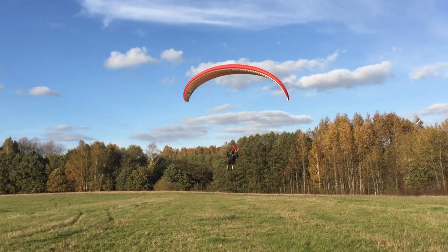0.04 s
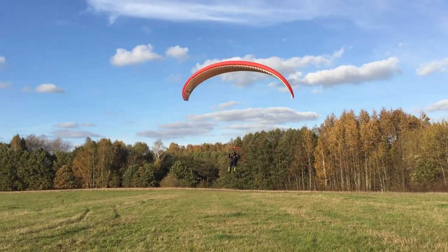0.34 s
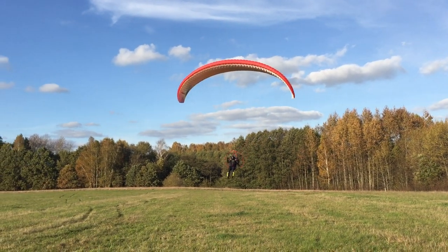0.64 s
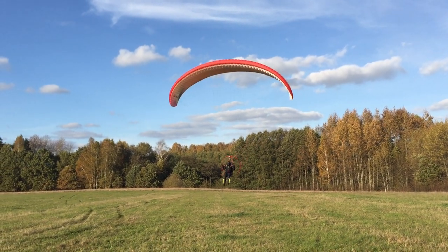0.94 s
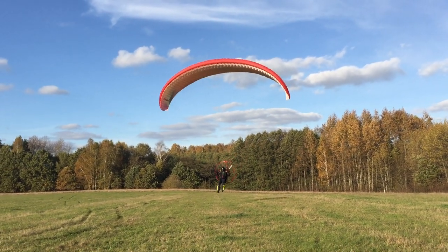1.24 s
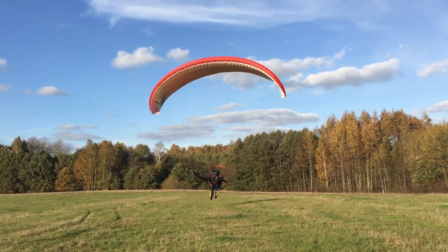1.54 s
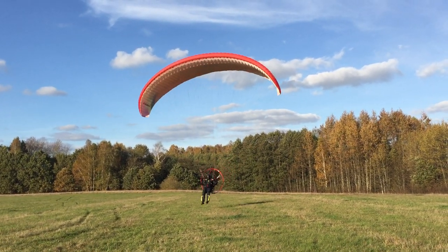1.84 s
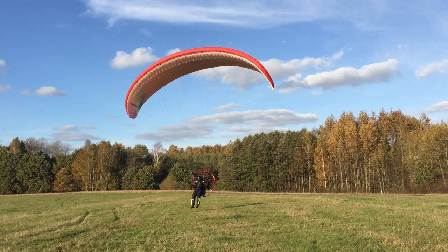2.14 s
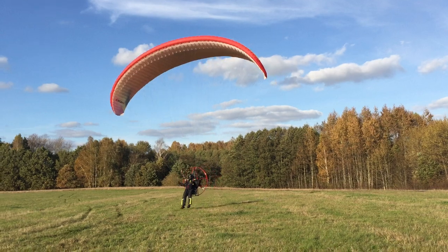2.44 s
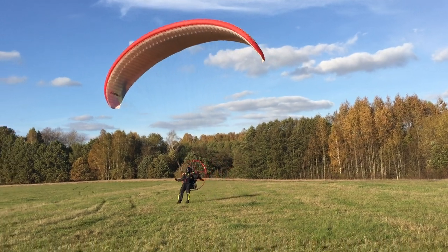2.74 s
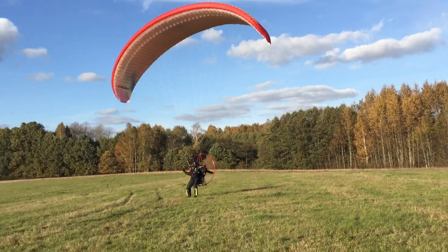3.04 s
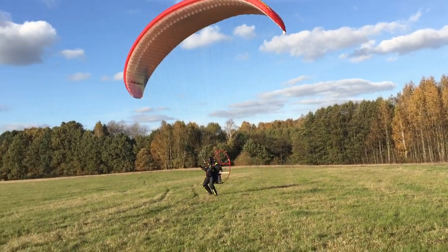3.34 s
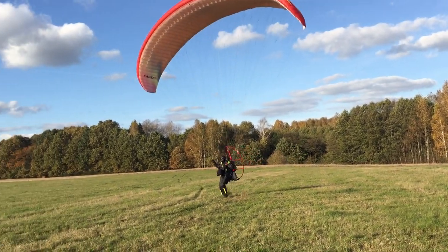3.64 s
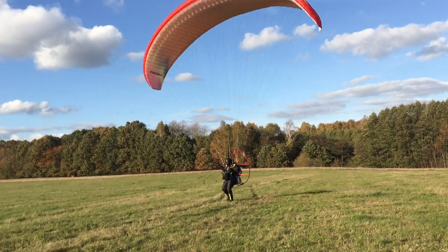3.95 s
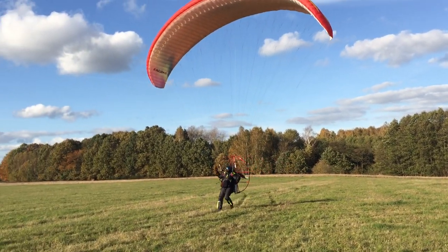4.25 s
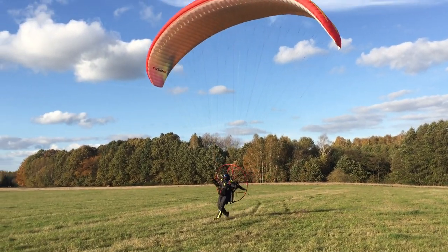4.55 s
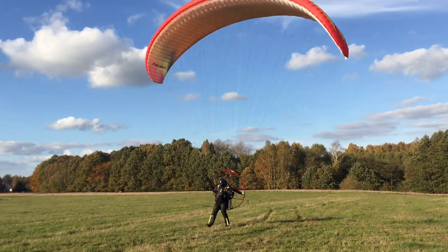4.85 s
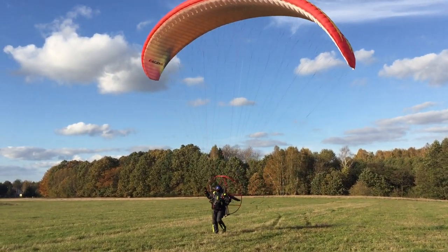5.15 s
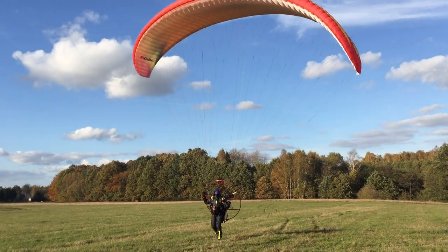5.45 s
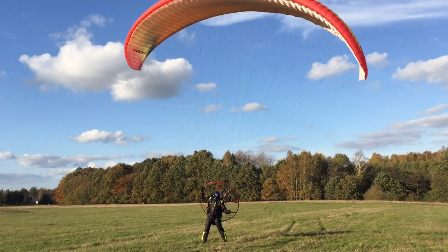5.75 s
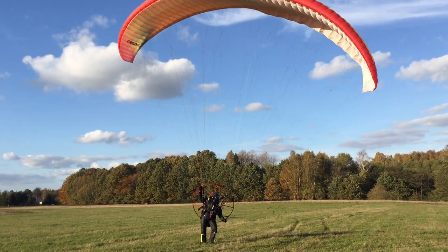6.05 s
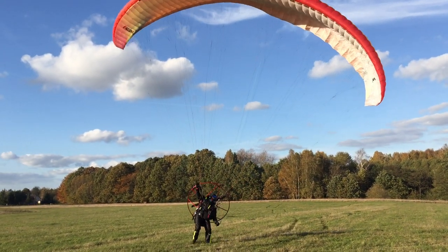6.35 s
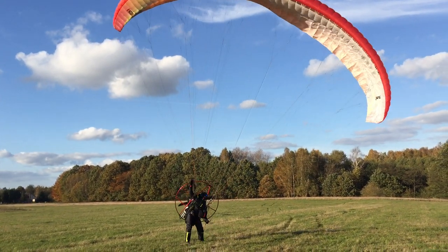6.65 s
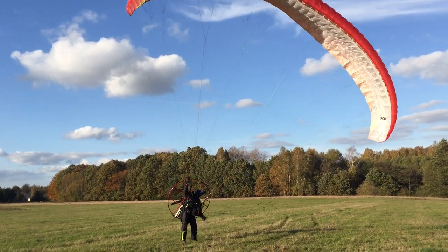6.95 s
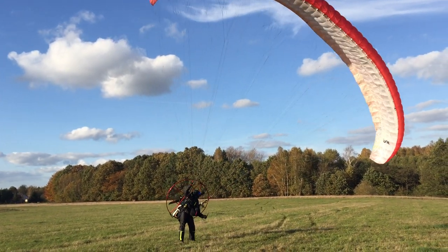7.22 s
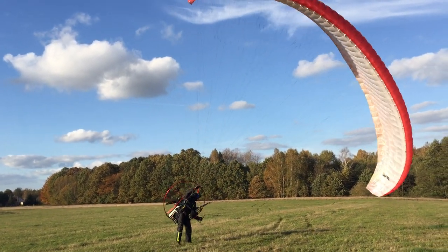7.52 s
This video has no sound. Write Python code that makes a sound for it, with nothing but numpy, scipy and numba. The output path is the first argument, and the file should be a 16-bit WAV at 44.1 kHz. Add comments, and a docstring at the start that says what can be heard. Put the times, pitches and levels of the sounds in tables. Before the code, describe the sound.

A paramotor idles over an open field, its small two-stroke engine popping unevenly while the propeller swishes and the cage buzzes. It grows sharper as it nears, then cuts out a little past halfway and coasts down. Harness buckles clink lightly. Wind on the microphone, a low rumble at first, builds into hard thumps and flaps that dominate the rest, over a faint rustle of grass and cloth.

```python
"""Paramotor landing on a field

The two-stroke idles, firing unevenly, mostly every second or third turn. The propeller swishes,
the cage buzzes, the belt squeaks; the engine is cut and coasts down, and harness buckles clink.
Wind buffets the microphone, lightly at first, then in hard flaps while the wing sinks."""
import sys
import numpy as np
from scipy import signal
from scipy.fft import rfft, irfft
from scipy.io import wavfile
from scipy.ndimage import uniform_filter1d, map_coordinates
from numba import njit

SR = 44100
rng = np.random.default_rng(int(sys.argv[2]) if len(sys.argv) > 2 else 0)


def output_pcm(signal):
    """Save a mono or channel-first signal as 16-bit PCM at the path in sys.argv[1].

    Samples are clipped to [-1, 1] before scaling.
    """
    pcm = np.clip(np.atleast_2d(signal).T, -1, 1) * 32767
    wavfile.write(sys.argv[1], SR, np.round(pcm).astype(np.int16))


N = 338688
T = np.arange(N) / SR
IDLE_HZ = 38


def undb(db):
    """Decibels to gain."""
    return 10 ** (np.asarray(db) / 20)


def unit(x):
    """Scale to rms 1."""
    return x / np.sqrt(np.mean(x ** 2) + 1e-20)


def even(x, span_samples):
    """Hold a noise's running rms near 1."""
    return x / np.sqrt(uniform_filter1d(uniform_filter1d(x ** 2, span_samples), span_samples) + 0.05)


def curves(table):
    """A timed table's columns, interpolated per sample."""
    time_s, *columns = np.transpose(table)
    return [np.interp(T, time_s, column) for column in columns]


def noise(spectrum):
    """Noise shaped by (freq_hz, density_db) points, silent above the last; rms 1."""
    hz, db = np.transpose(spectrum)
    bins_hz = np.maximum(np.arange(N // 2 + 1) * SR / N, 1)
    gain = undb(np.interp(np.log(bins_hz), np.log(hz), db, right=-np.inf))
    return unit(irfft(rfft(rng.standard_normal(N)) * gain, N))


def walk(rate_hz):
    """Smooth random drift; rms 1."""
    span = max(int(SR / rate_hz), 2)
    return unit(uniform_filter1d(uniform_filter1d(rng.standard_normal(N), span), span))


def patchy(x, depth_db):
    """Gusty air lets narrow bands swell and fade on their own; rms 1."""
    bands = signal.stft(x, nperseg=1024)[2]
    drift = uniform_filter1d(rng.standard_normal(bands.shape), size=4, axis=0)
    drift = unit(uniform_filter1d(drift, size=5, axis=1))
    return unit(signal.istft(bands * undb(depth_db * drift))[1][:N])


def resonant_noise(pitch_hz, width_hz):
    """White noise passed twice through one resonance."""
    b, a = signal.iirpeak(pitch_hz, pitch_hz / width_hz, fs=SR)
    return signal.lfilter(b, a, signal.lfilter(b, a, rng.standard_normal(N)))


@njit
def lowpass(x, edge_hz, damping):
    """State-variable low-pass with a moving edge."""
    y, band_state, low_state = np.empty(len(x)), 0., 0.
    for i in range(len(x)):
        g = np.tan(np.pi * min(edge_hz[i], SR / 4) / SR)
        band = (band_state + g * (x[i] - low_state)) / (1 + g * (g + damping))
        y[i] = low_state + g * band
        band_state, low_state = 2 * band - band_state, 2 * y[i] - low_state
    return y


def delayed(x, lag_s):
    """Moving delay."""
    return map_coordinates(x, [(T - lag_s) * SR], order=5, mode="mirror")


def add(out, start_s, sound):
    """Mix a sound in at start_s."""
    i = int(np.clip(start_s * SR, 0, N - 1))
    out[i:i + len(sound)] += sound[:N - i]


def puffs(starts_s, peaks_db, rise_s, decay_s):
    """Envelope of puffs that open quickly and die away."""
    out, t = np.zeros(N), T[:SR // 8]
    shape = (1 - np.exp(-t / rise_s)) * np.exp(-t / decay_s)
    for start_s, peak_db in zip(starts_s, peaks_db):
        add(out, start_s, undb(peak_db) * shape / shape.max())
    return out


def mode(t, pitch_hz, t60_s):
    """One decaying sine."""
    return np.sin(2 * np.pi * pitch_hz * t) * np.exp(-np.log(1000) * t / t60_s)


# Firings, and lighter ticks on turns between them, the last just before the cut: start_s, crack_db, bark_db
ENGINE_HITS = [(0.045, -78, -54), (0.1247, -78, -53), (0.173, -78, -56), (0.3607, -77, -49), (0.437, -75, -50),
               (0.517, -66, -52), (0.592, -67, -45.5), (0.67, -66, -53), (0.802, -69, -58), (0.852, -67, -47),
               (0.934, -68, -48), (0.993, -72, -52), (1.067, -66, -51), (1.122, -71, -50), (1.226, -67, -47),
               (1.275, -65, -57), (1.356, -63, -48), (1.408, -62, -49), (1.511, -61, -43), (1.5615, -62, -42),
               (1.637, -63, -48), (1.74, -63, -51), (1.792, -65, -45.5), (1.843, -56, -42.5), (1.892, -55, -41),
               (1.942, -51, -47), (2.018, -64, -42), (2.066, -63, -48), (2.092, -44.5, -43.5),
               (2.173, -51, -49), (2.249, -46, -41), (2.3256, -47, -39), (2.381, -64, -49), (2.437, -66, -46),
               (2.463, -67, -47), (2.5676, -45, -47), (2.62, -50, -52), (2.651, -51, -45), (2.709, -65, -54),
               (2.732, -56, -49.5), (2.787, -49, -48), (2.813, -56, -61), (2.867, -51, -52), (2.9, -58, -48),
               (2.953, -44.5, -45), (3.032, -51, -44), (3.113, -62, -46), (3.139, -58, -52), (3.195, -57, -47),
               (3.223, -55, -48), (3.251, -48, -47), (3.31, -45, -50), (3.336, -48, -48), (3.36, -55, -52),
               (3.4175, -39.5, -40.5), (3.503, -42, -46), (3.557, -57, -66), (3.587, -42, -44.5),
               (3.641, -54, -57), (3.67, -40.5, -53), (3.7271, -44, -61), (3.752, -40.5, -49.5),
               (3.808, -47, -49), (3.8357, -42.5, -53), (3.891, -42.5, -49), (3.918, -52, -66),
               (3.947, -60, -65), (3.969, -41.5, -49), (4.002, -49, -66), (4.025, -40.5, -43),
               (4.078, -48, -44.5), (4.156, -50, -52), (4.182, -53, -53), (4.208, -46, -53), (4.235, -54, -54),
               (4.2592, -52, -55), (4.2884, -45, -45)]
# Firing crack: freq_hz, density_db
CRACK_SPECTRUM = [(2500, -37), (3500, 26.5), (4800, 1), (6200, 10), (7600, 0), (9300, 9), (10500, -2),
                  (12000, 9.5), (13600, 9), (15700, 3)]
# Silencer resonances: pitch_hz, width_hz, level_db
SILENCER_MODES = [(180, 115, 8), (606, 290, 0.5), (990, 430, 4), (1524, 370, 4.5), (1844, 270, 2.5)]
# Piston metal: freq_hz, density_db
CLATTER_SPECTRUM = [(3000, -7.5), (7800, 2), (9300, 6.5), (10500, -5), (12000, -2), (13500, -4),
                    (15700, -3)]
# Piston clatter, growing as the engine nears, dropping at the cut: time_s, level_db
CLATTER_LEVELS = [(0, -97), (1.2, -82), (2.0, -72), (3.1, -71), (3.6, -67.5), (4.28, -64), (4.37, -71),
                  (5.0, -82)]


def engine(turns, stroke_decay_turns=0.98):
    """Firings and ticks crack and bark in the silencer; every turn the exhaust chuffs and the piston clatters."""
    start_s, crack_db, bark_db = np.transpose(ENGINE_HITS)
    ticks = puffs(start_s, crack_db - 3, rise_s=0.00022, decay_s=0.0013)
    tails = puffs(start_s, crack_db - 10, rise_s=0.0037, decay_s=0.01)
    cracks = (ticks + tails) * patchy(noise(CRACK_SPECTRUM), depth_db=5.5)

    gas = sum(undb(db) * resonant_noise(hz, width_hz) for hz, width_hz, db in SILENCER_MODES)
    barks = puffs(start_s + 0.0045, bark_db + 8.5, rise_s=0.0012, decay_s=0.004)
    per_turn_db = 3 * rng.standard_normal(N // 100)[turns.astype(int)]
    stroke = undb(per_turn_db) * np.exp(-(turns % 1) / stroke_decay_turns)
    chuffs = unit(stroke) * undb(np.interp(T, [0, 2.0, 4.3, 4.9], [-68, -52.5, -67, -72]))
    exhaust = np.hypot(barks, chuffs) * even(unit(gas), 500)

    slap = unit((0.9 + stroke) * undb(3 * walk(500)))
    clatter = slap * patchy(noise(CLATTER_SPECTRUM), depth_db=1) * undb(curves(CLATTER_LEVELS)[0])
    return cracks + exhaust + clatter


def crank_turns(coast_s=0.77):
    """Running turn count: whole turns between engine hits, slowing freely after the last."""
    fired_s = np.append(0, np.array(ENGINE_HITS)[:, 0])
    turns_between = np.maximum(np.round(np.diff(fired_s) * IDLE_HZ), 1)
    powered = np.interp(T, fired_s, np.append(0, np.cumsum(turns_between)))
    since_cut_s = np.maximum(T - fired_s[-1], 0)
    return powered + IDLE_HZ * coast_s * (1 - np.exp(-since_cut_s / coast_s))


# Shell ring relative to bark_db, strongest head-on: time_s, gain_db
SHELL_GAINS = [(0, 8), (.45, 0), (.65, -16), (4.3, -10)]


def silencer_shell():
    """Each firing knocks the silencer shell into a short ring."""
    start_s, _, bark_db = np.transpose(ENGINE_HITS)
    knocks = puffs(start_s + 0.0028, bark_db, rise_s=0.0015, decay_s=0.013)
    ring = even(unit(resonant_noise(pitch_hz=1840, width_hz=170)), 1000)
    return knocks * ring * undb(curves(SHELL_GAINS)[0])


# Blade noise, low to high: freq_hz, density_db
WHOOSH_SPECTRUM = [(150, -8.5), (330, -8.5), (640, 4), (800, 0), (1100, 4), (1400, -4), (1900, -8),
                   (2300, -20), (2800, -29), (4000, -45)]
SWISH_SPECTRUM = [(1800, -7.5), (2350, 2), (2700, -6.5), (3100, -0.5), (3550, 2), (4200, -4.5), (4900, -12),
                  (6500, -24.5)]
TIP_SPECTRUM = [(3800, 0.5), (4900, -1.5), (5700, 5), (6600, -1), (7500, -9.5), (9000, -14), (10500, -50),
                (15000, -45.5)]
# Blade noise as the pilot turns side-on and the blades slow: time_s, whoosh_db, swish_db, tip_db
BLADE_LEVELS = [(0, -45.5, -55, -53.5), (.5, -44, -55.5, -54.5), (1.5, -44.5, -55.5, -50),
                (2, -44.5, -60.5, -48.5), (2.5, -46, -53, -49), (3.0, -45, -53.5, -50),
                (3.549, -48, -52, -51.5), (4.0, -44.5, -54, -60), (4.55, -48.5, -52.5, -61),
                (4.72, -44, -58.5, -94)]
# Echo off the grass: time_s, lag_s
GROUND_ECHO = [(0, 0.00046), (1.0, 0.00041), (2.2, 0.00071), (4.0, 0.00055)]
# Air dulling the distant tips: time_s, edge_hz
AIR_EDGE = [(0, 7740), (1.1, 7600), (1.8, 11130)]


def propeller(turns, belt_ratio=2.72, doppler_depth=0.0752, fade_start_s=4.53):
    """Two belt-driven blades; their noise swells and bends in pitch as each tip swings to and fro."""
    blade_rad = 2 * np.pi * 2 * turns / belt_ratio + 0.4 * walk(8)
    whoosh = patchy(noise(WHOOSH_SPECTRUM), depth_db=1.5)
    whoosh = unit(whoosh + undb(-11) * delayed(whoosh, curves(GROUND_ECHO)[0]))
    # Swirl loosens the pattern of the pitch bends.
    travel_s = np.cumsum(doppler_depth * np.sin(2 * blade_rad + 0.8 * walk(60))) / SR
    swish = delayed(patchy(noise(SWISH_SPECTRUM), depth_db=2), 0.5 * travel_s)
    tip = delayed(patchy(noise(TIP_SPECTRUM), depth_db=3.5), travel_s)
    tip = unit(lowpass(tip, curves(AIR_EDGE)[0], 1.0))

    def envelope(level_db, lag_rad, depth_db, fade_db_per_s):
        """Swelling with blade angle, and a steady fade after the cut."""
        angle = blade_rad - lag_rad
        lobes = 0.58 * np.cos(angle) + 0.18 * np.cos(2 * angle) + 1.25 * np.cos(4 * angle)
        swelling = unit(undb(depth_db * (lobes + 0.57 * walk(190))))
        return swelling * undb(level_db - fade_db_per_s * np.maximum(T - fade_start_s, 0))

    whoosh_db, swish_db, tip_db = curves(BLADE_LEVELS)
    return (whoosh * envelope(whoosh_db - 1.8, lag_rad=0, depth_db=2, fade_db_per_s=24.5)
            + swish * envelope(swish_db - 0.2, lag_rad=1, depth_db=2, fade_db_per_s=21)
            + tip * envelope(tip_db - 2.5, lag_rad=0.75, depth_db=2.5, fade_db_per_s=7))


# Propeller cage buzz: time_s, peak_db
CAGE_LEVELS = [(0, -57.5), (2.2, -51), (3.6, -49.5), (4.5, -56.5), (4.8, -70)]


def cage(turns, centre_hz=3900, scatter_db=3):
    """Every crank turn shakes two loose spots of cage and netting, each ringing at its own pitch."""
    out, t, peak_db = np.zeros(N), T[:SR // 12], curves(CAGE_LEVELS)[0]
    turn_samples = np.flatnonzero(np.diff(np.floor(turns)))
    for i in np.repeat(turn_samples, 2):
        detune, strength = rng.standard_normal(2)
        ring = mode(t, centre_hz * np.exp(0.22 * detune), t60_s=0.036)
        add(out, T[i] + rng.uniform(0, 0.25 / IDLE_HZ), undb(peak_db[i] + scatter_db * strength) * ring)
    return out


# Steady wind: time_s, rumble_db, eddy_db
WIND_LEVELS = [(0, -36, -62), (1.3, -35.5, -62.5), (2.6, -39.5, -73.5), (3.7, -40, -75.5),
               (4.4, -32.5, -49.5), (4.82, -31, -35.5), (5.1, -22, -34.5), (5.65, -20, -35.5),
               (6.0, -25.5, -40), (6.4, -23, -40), (6.67, -25.5, -49.5), (6.88, -31.5, -48),
               (7.03, -27, -42), (7.36, -31, -50.5), (7.68, -30, -34.5)]
# Gusts and lulls: start_s, length_s, rumble_db, eddy_db
GUSTS = [(0.397, 0.055, -26, -36.5), (0.695, 0.092, -30, -70.5), (0.849, 0.022, -23.5, -51),
         (1.09, 0.022, -15, -26), (1.58, 0.14, -26.5, -46), (2, 0.037, -26, -48), (2.339, 0.051, -28, -49),
         (2.665, 0.035, -21, -61), (2.753, 0.065, -30.5, -57.5), (3.419, 0.1, -30, -47),
         (3.864, 0.13, -30.5, -40), (4.039, 0.057, -30.5, -34.5), (4.191, 0.03, -40, -44.5),
         (4.501, 0.062, -19, -37), (4.591, 0.077, -18.5, -32.5), (4.69, 0.067, -21.5, -31),
         (4.883, 0.1, -21, -31), (4.977, 0.03, -26, -46), (5.104, 0.076, -17, -28.5),
         (5.207, 0.1, -24.5, -27), (5.396, 0.065, -16, -25), (5.486, .08, -19.5, -29),
         (5.592, 0.055, -18.5, -28), (5.701, 0.04, -22.5, -29.5), (5.776, 0.086, -20.5, -27.5),
         (5.994, 0.06, -26, -30.5), (6.199, 0.039, -17, -35.5), (6.453, 0.074, -19.5, -37),
         (6.568, 0.074, -23, -33), (6.692, 0.11, -22.5, -29.5), (6.923, 0.063, -22.5, -24.5),
         (7.047, 0.052, -22, -35), (7.108, .108, -22, -28.5), (7.241, 0.022, -30, -28),
         (7.447, 0.068, -21, -35.5), (7.579, 0.16, -24.5, -31.5)]
# Wind rumble: freq_hz, density_db
RUMBLE_SPECTRUM = [(20, -43), (32, -17), (45, -5), (65, 1), (100, -2), (160, -6), (210, -9.5), (280, -22.5),
                   (400, -29), (800, -53)]


def wind(attack_s=0.017, release_s=0.035, base_edge_hz=460):
    """Turbulence at the microphone port: deep rumble, and eddies that get louder and sharper together."""
    surge = undb(walk(6.6))
    rumble_gain, eddy_gain = (undb(db) * surge for db in curves(WIND_LEVELS))
    for start_s, length_s, rumble_db, eddy_db in GUSTS:
        corners_s = [-attack_s / 2, attack_s / 2, length_s - release_s / 2, length_s + release_s / 2]
        gust = np.interp(T - start_s, corners_s, [0, 1, 1, 0])
        rumble_gain += gust * (undb(rumble_db - 2) - rumble_gain)
        eddy_gain += gust * (undb(eddy_db - 1) - eddy_gain)
    rumble = even(noise(RUMBLE_SPECTRUM), 2000) * unit(undb(1.6 * walk(140)))

    flutter = walk(110)
    # Sustained strong wind breaks into smaller, brighter eddies.
    sustained_db = uniform_filter1d(20 * np.log10(eddy_gain), size=16000)
    edge_hz = base_edge_hz * np.exp(0.26 * flutter + 0.12 * (sustained_db + 35))
    swirl = noise([(80, -43), (170, -3.5), (280, -1.5), (600, -0.5),
                   (1400, -13.5), (2100, -27.5), (4000, -62)])
    swirl = even(even(swirl, 400) * unit(undb(flutter)), 2000)
    eddies = even(unit(lowpass(lowpass(swirl, edge_hz, 3.3), edge_hz, 1.9)), 6000)
    return rumble * rumble_gain + eddies * eddy_gain * undb(1)


def add_vortex(out, centre_s, peak_db, pitch_hz, width_cycles, half_s=1 / 12):
    """Mix in one passing vortex: a short, uneven pressure swing."""
    cycles = (T[:int(2 * half_s * SR)] - half_s) * pitch_hz
    start_rad, bend_rad = rng.uniform(0, 2 * np.pi, 2)
    phase = 2 * np.pi * cycles + start_rad + 0.45 * np.sin(np.pi * cycles + bend_rad)
    swing = np.exp(-(cycles / width_cycles) ** 2) * np.sin(phase)
    add(out, centre_s - half_s, undb(peak_db) * swing / np.abs(swing).max())


# Heavy buffets: time_s, peak_db, pitch_hz
BUFFETS = [(0.406, -17.5, 129), (0.713, -23, 75), (1.096, -9, 71), (1.108, -10.5, 110), (1.14, -11, 130),
           (1.674, -20, 76), (2.008, -16.5, 129), (2.354, -40, 79.5), (2.67, -23.5, 92.7),
           (3.864, -19.5, 110), (3.897, -15, 171), (4.035, -13.5, 69.6), (4.19, -12.5, 94),
           (4.325, -17, 80), (4.518, -8.5, 176), (4.617, -6, 76.5), (4.739, -10, 108), (4.915, -15.5, 170),
           (5.081, -9, 105), (5.22, -5, 260), (5.285, -6.5, 103), (5.413, -5.5, 112), (5.489, -5.5, 170),
           (5.502, -7.5, 73.5), (5.564, -5.5, 181), (5.583, -10.5, 220), (5.671, -13, 220),
           (5.808, -6.5, 107.4), (5.94, -6, 200), (5.999, -5.5, 97), (6.167, -12.5, 250),
           (6.234, -11.5, 168.5), (6.249, -7.5, 130), (6.456, -14, 150), (6.485, -13, 110),
           (6.531, -10.5, 111), (6.814, -15, 160), (6.961, -6, 99), (7.018, -14.5, 170), (7.048, -7, 199),
           (7.077, -7.5, 122), (7.167, -10, 160), (7.204, -10.5, 250), (7.304, -18, 130), (7.448, -11, 95),
           (7.561, -7, 95), (7.621, -11, 180), (7.664, -14.5, 180.5)]
# Sharp flaps: time_s, peak_db, snap_db
FLAPS = [(4.627, -22.5, -60), (4.742, -18, -43.5), (4.902, -33, -65), (4.932, -33, -65), (4.956, -32, -64),
         (5.032, -37, -66), (5.108, -26, -55), (5.139, -17.5, -47), (5.189, -21, -67), (5.225, -18, -35.5),
         (5.256, -24, -46), (5.285, -15.5, -32), (5.345, -20, -78), (5.368, -27, -55.5),
         (5.377, -11, -35.5), (5.396, -31, -49), (5.414, -22, -36), (5.434, -22.5, -39), (5.486, -18, -50),
         (5.496, -22, -34), (5.514, -15, -45), (5.536, -28, -51), (5.56, -18, -59), (5.587, -24, -69),
         (5.599, -19.5, -57), (5.624, -25.5, -66), (5.647, -19.5, -47), (5.659, -14.5, -56),
         (5.686, -15, -64), (5.724, -15.5, -41), (5.771, -31, -70), (5.786, -16, -49), (5.8, -12.5, -44.5),
         (5.81, -15.5, -52), (5.836, -37, -66), (5.895, -15, -53), (5.945, -15.5, -65), (6.002, -22, -54),
         (6.028, -24, -68), (6.037, -28, -71), (6.055, -15, -60), (6.103, -11.5, -62), (6.134, -26.5, -72),
         (6.197, -20.5, -70), (6.401, -26, -57), (6.459, -25, -61), (6.571, -18, -64), (6.579, -17, -65),
         (6.607, -19, -78), (6.621, -17, -59), (6.7, -30, -81), (6.759, -17.5, -73), (6.791, -23, -72),
         (6.926, -28, -78), (6.947, -18, -46), (6.963, -24.5, -70), (7.051, -37.5, -75), (7.112, -24, -67),
         (7.154, -20.5, -51), (7.175, -19, -60), (7.199, -15.5, -52), (7.474, -16, -52), (7.594, -25, -75),
         (7.628, -31, -65), (7.655, -33, -58), (7.67, -7.5, -54)]
# Snap of a flap: freq_hz, density_db
SNAP_SPECTRUM = [(400, -11.5), (950, 6), (1400, -2.5), (1900, -16.5), (2600, -34.5), (3600, -65.5)]


def buffets():
    """Large vortices thump and shed a smaller one; small ones flap with a rough snap and a duller wake."""
    flap_s, _, snap_db = np.transpose(FLAPS)
    snaps = puffs(flap_s - 0.001, snap_db + 7, rise_s=0.00093, decay_s=0.0032)
    out = snaps * even(noise(SNAP_SPECTRUM), 150)
    for time_s, peak_db, pitch_hz in BUFFETS:
        add_vortex(out, time_s + 0.00845, peak_db - 6, max(pitch_hz, 75), width_cycles=0.78)
        add_vortex(out, time_s + 0.00745, peak_db - 12, pitch_hz=280, width_cycles=0.87)
    speeds = np.exp(0.12 * rng.standard_normal(len(FLAPS)))
    for (time_s, peak_db, _), speed in zip(FLAPS, speeds):
        add_vortex(out, time_s + 0.002945, peak_db - 6.5, pitch_hz=640 * speed, width_cycles=0.98)
        add_vortex(out, time_s + 0.00531, peak_db - 4, pitch_hz=340 * speed, width_cycles=1)
    return out


def wind_throb(level_db=-44, sway_db=6):
    """The deepest part of the wind sways independently of the gusts."""
    bass = noise([(20, -21), (35, -6), (55, 2.5), (90, -13.5), (150, -35.5)])
    return bass * undb(level_db) * unit(undb(sway_db * walk(12)))


# Buckle hits: start_s, peak_db, knock_relative_db
CLINKS = [(4.87, -43, 3), (5.060, -42.5, -26), (5.131, -50, -24), (5.145, -37, -20), (5.233, -51, -16),
          (5.264, -51.5, -2)]
# Buckle metal: pitch_hz, level_db, t60_s
BUCKLE_MODES = [(3130, -16, .04), (3380, -2, .07), (3950, -12, .03), (4600, -9, .025), (5600, -15, .03),
                (6300, -7, 0.048)]


def buckles():
    """Harness hardware: a short rattle excites the metal's modes over a dull knock."""
    start_s, peak_db, knock_relative_db = np.transpose(CLINKS)
    hits = puffs(start_s, peak_db, rise_s=0.00047, decay_s=0.012)
    modes = sum(undb(db) * mode(T[:SR // 4], hz, t60_s) for hz, db, t60_s in BUCKLE_MODES)
    ring = signal.fftconvolve(hits * rng.standard_normal(N), modes / np.linalg.norm(modes))[:N]
    rattle = hits * noise([(2600, -13), (3100, 12.5), (4500, 3.5), (6400, -11),
                           (7200, -20), (12000, -19), (15500, -28)])
    knock = puffs(start_s, peak_db + knock_relative_db, rise_s=0.001, decay_s=0.014)
    knock *= noise([(500, -14), (1800, 17), (2500, 15), (4000, -23)])
    return undb(-13) * ring + undb(-7) * rattle + undb(-9) * knock


# Squeaks, thin whistles and faint, very high tones: start_s, length_s, pitch_hz, width_hz, level_db
NARROW_TONES = [(3.288, 0.19, 9400, 600, -62.5), (3.42, 0.29, 9060, 650, -68),
                (4.372, .06, 13200, 120, -80), (4.52, 0.089, 9280, 840, -62),
                (4.532, 0.076, 14250, 700, -76), (4.761, 0.11, 13180, 90, -75),
                (4.824, 0.19, 9280, 603, -78), (5.044, .085, 13000, 90, -82), (5.72, 0.041, 5450, 600, -68),
                (6.087, 0.028, 7300, 120, -67), (6.448, .016, 14000, 1500, -73),
                (6.722, .022, 15000, 200, -75), (6.945, .035, 15080, 300, -81),
                (6.563, 0.2, 742, 40, -55.5), (6.77, 0.16, 752, 40, -57.5), (7.338, 0.24, 744, 45, -52)]


def narrow_tones():
    """Squeaks, thin whistles and a few faint, very high flickering tones; each swells and fades."""
    out = np.zeros(N)
    for start_s, length_s, pitch_hz, width_hz, level_db in NARROW_TONES:
        arch = np.sin(np.pi * np.clip((T - start_s) / length_s, 0, 1))
        phase = 2 * np.pi * pitch_hz * T
        tone = walk(width_hz) * np.cos(phase) + walk(width_hz) * np.sin(phase)
        out += undb(level_db) * arch * tone
    return out


# Grass and cloth rustle: freq_hz, density_db
RUSTLE_SPECTRUM = [(300, -18.5), (900, 17.5), (1500, 7.5), (2200, 5.5), (3600, 3), (4800, -3.5),
                   (6000, -2.5), (7600, -11.5), (9200, -10), (10500, -27.5), (15500, -28.5)]
# Rustle strength: time_s, level_db
RUSTLE_LEVELS = [(0, -63), (5.2, -62), (5.56, -69), (5.68, -59.5), (5.87, -61.5), (6.08, -62.5),
                 (6.23, -60.5), (6.35, -63.5), (6.6, -65), (7.0, -66.5), (7.2, -63), (7.35, -65),
                 (7.68, -64.5)]
# Brief swishes: centre_s, length_s, level_db
GRASS_SWISHES = [(4.57, 0.13, -69), (6.233, .22, -71.5)]


def grass_and_cloth(hiss_db=-80):
    """Grass and cloth rustle and swish over a faint steady hiss."""
    rustle = noise(RUSTLE_SPECTRUM) * undb(curves(RUSTLE_LEVELS)[0] + 1.7 * walk(60))
    strokes = sum(undb(level_db) * np.maximum(1 - 2 * np.abs(T - centre_s) / length_s, 0)
                  for centre_s, length_s, level_db in GRASS_SWISHES)
    swish = strokes * noise([(2000, -11), (4500, -4), (11000, -3), (15500, -3)])
    hiss = noise([(1000, -5.5), (9000, -1), (10500, -1), (16000, -4.5)])
    return rustle + swish + undb(hiss_db) * hiss


def scene():
    """Mono mix: the machine runs down, the wind stays."""
    turns = crank_turns()
    engine_fade = np.interp(T, [5.0, 5.4], [1, 0])
    machine = engine_fade * engine(turns) + propeller(turns)
    details = narrow_tones() + buckles()
    outdoors = wind() + buffets() + grass_and_cloth() + wind_throb()
    ringing = engine_fade * (silencer_shell() + cage(turns))
    return (machine + ringing + details + outdoors)[None]


def record(dry, low_hz=32, top_hz=15650):
    """The microphone drops the deepest bass and cuts the top."""
    thinned = signal.sosfilt(signal.butter(4, low_hz, "high", fs=SR, output="sos"), dry)
    return signal.sosfilt(signal.ellip(10, 0.2, 80, top_hz, fs=SR, output="sos"), thinned)


dry = scene()
out = record(dry)
output_pcm(out)
```